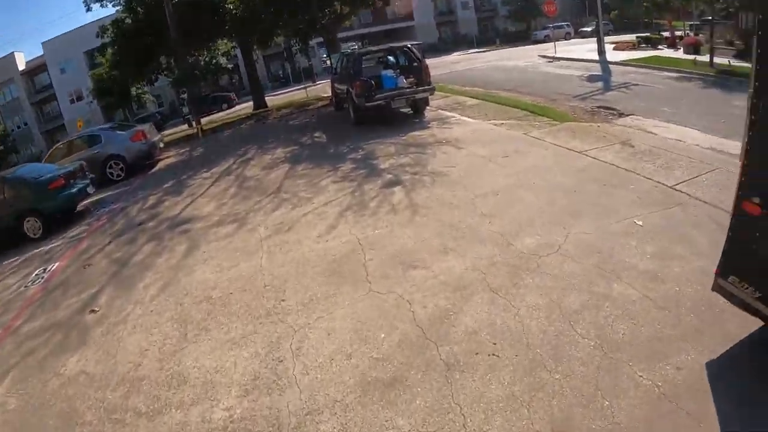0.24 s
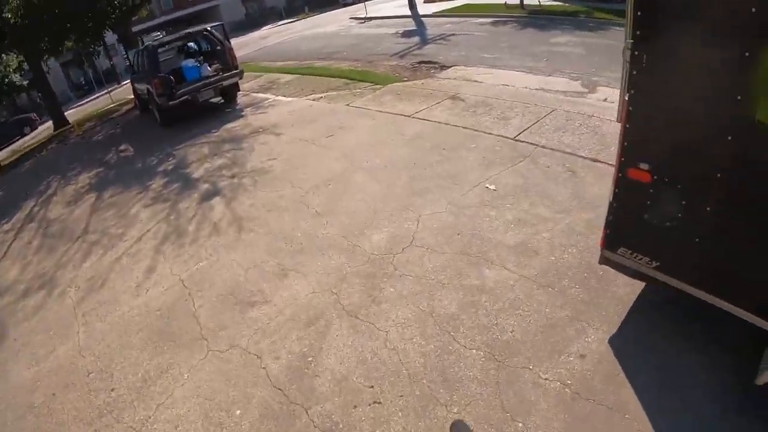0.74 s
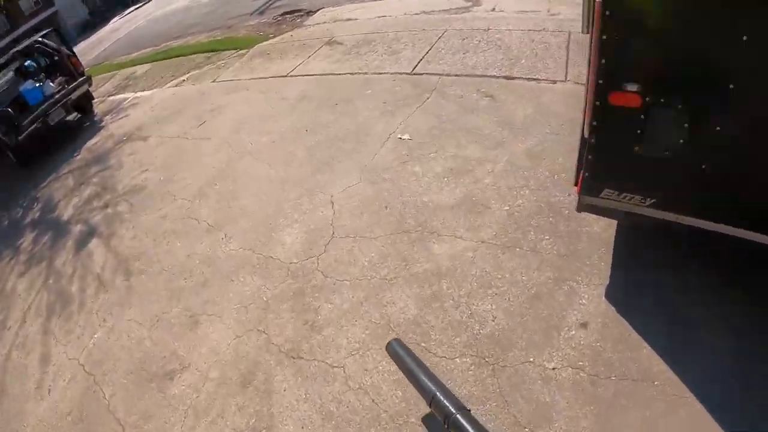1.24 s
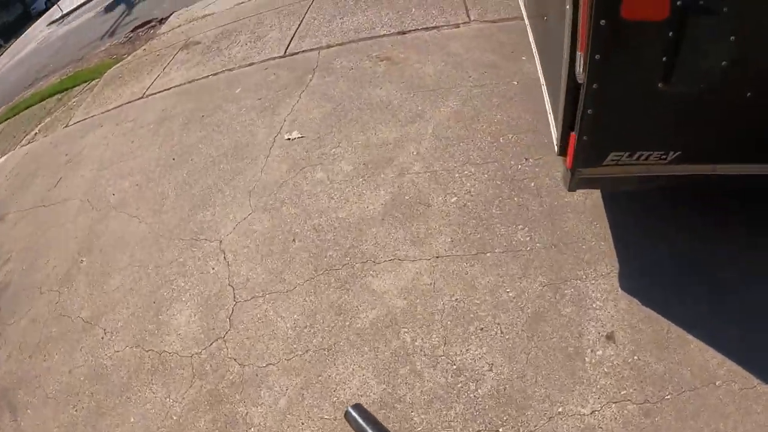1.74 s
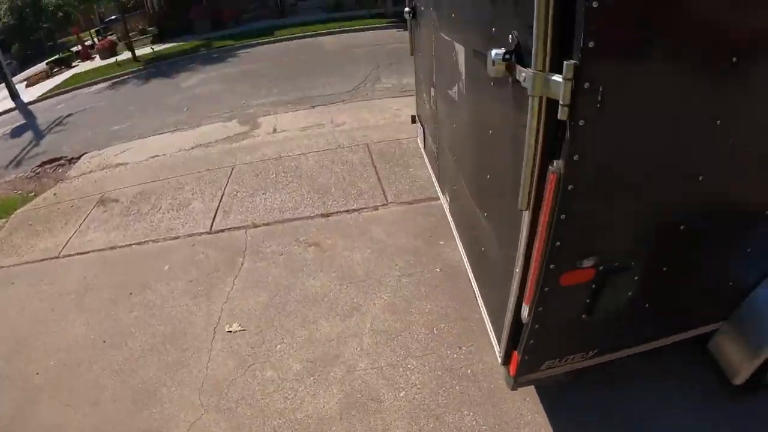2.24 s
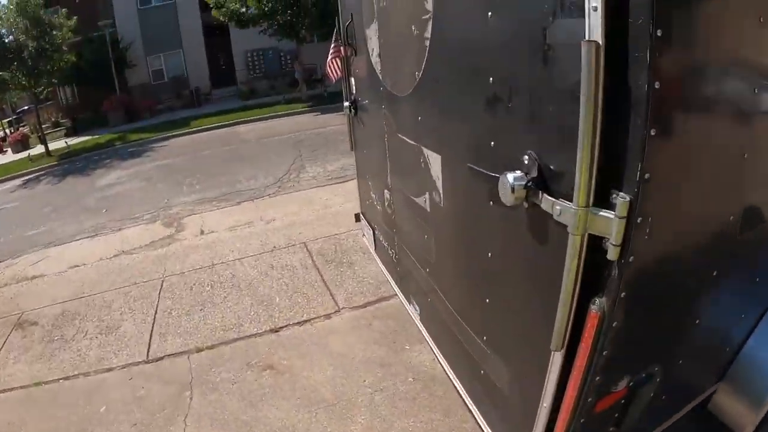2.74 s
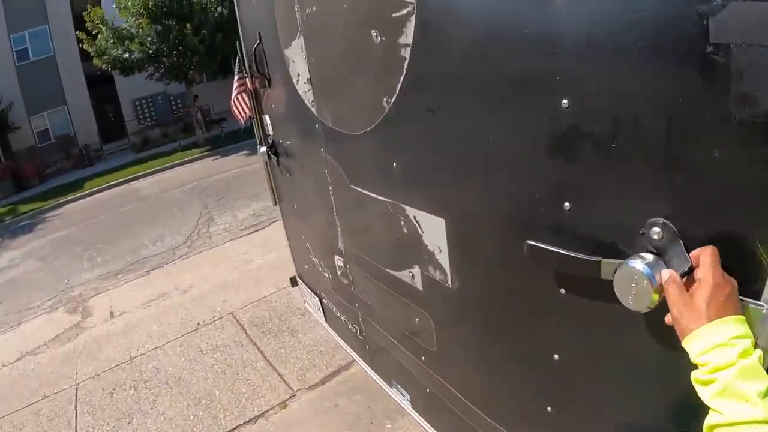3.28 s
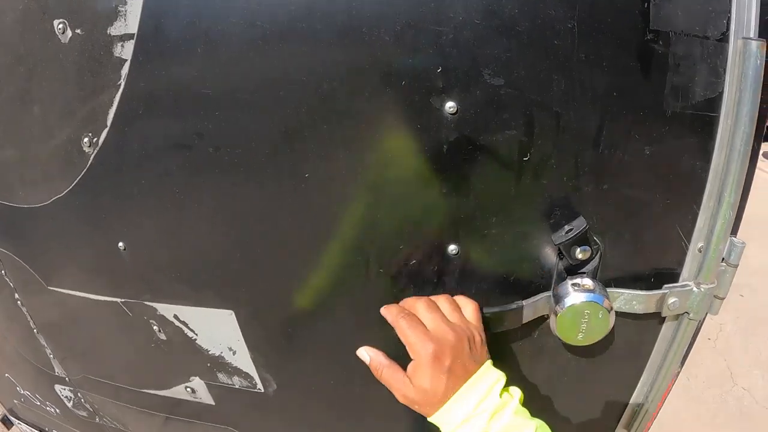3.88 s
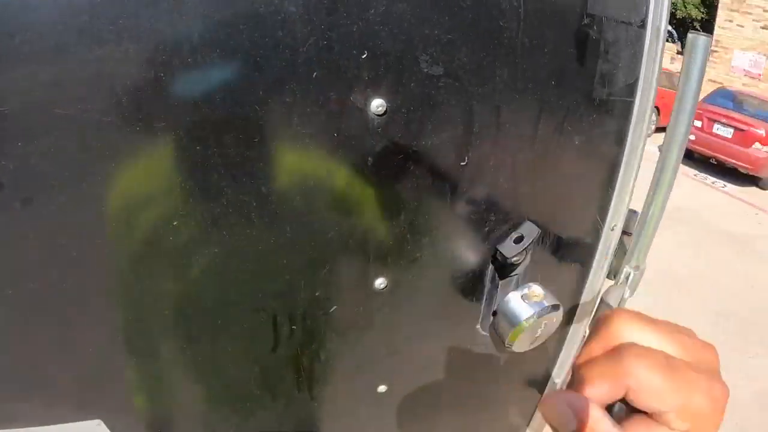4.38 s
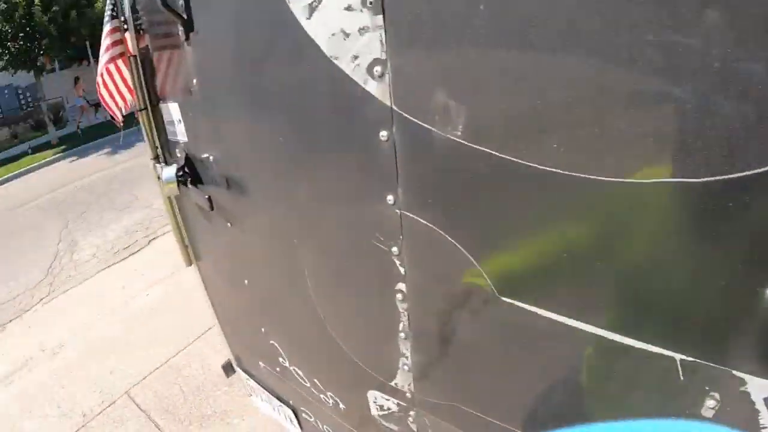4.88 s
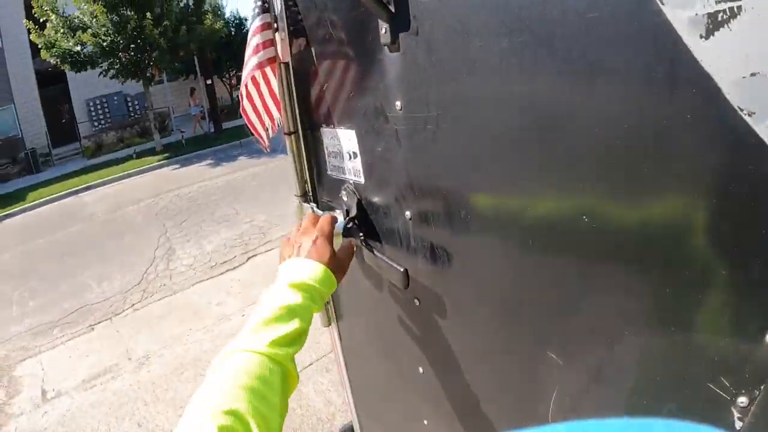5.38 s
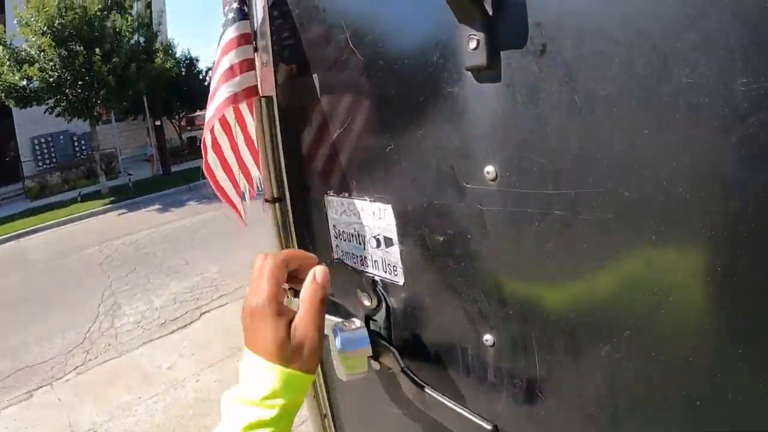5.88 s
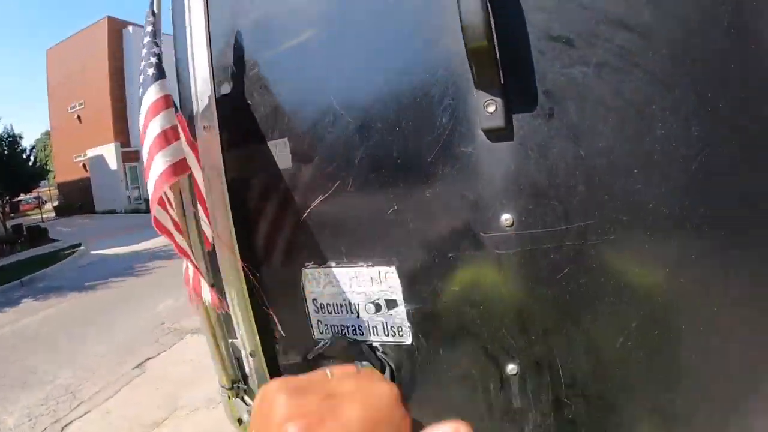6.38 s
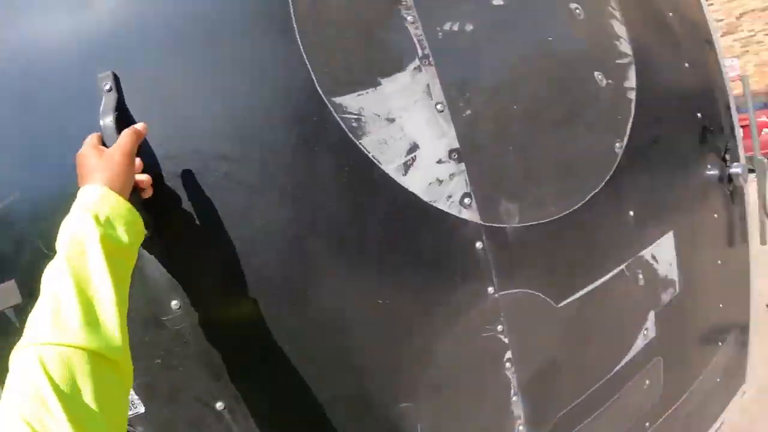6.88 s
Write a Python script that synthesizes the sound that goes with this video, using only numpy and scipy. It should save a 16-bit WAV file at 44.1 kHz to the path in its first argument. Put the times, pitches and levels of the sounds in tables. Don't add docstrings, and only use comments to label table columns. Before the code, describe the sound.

Outdoors on a street, close microphone. A small petrol engine drones low far away, revving higher around 0.9 to 2 s, under steady traffic hiss, faint leaves and early low wind rumble. Tiny ticks open; a brief drag comes at 0.85 s, then a tool clatters on concrete from 1.55 to 2.1 s, with sparrow and more distant bird chirps from 1.3 to 2.2 s. A lull follows. From 3.2 s a steel latch is touched and slid, a sharp scrape and crack at 3.6 to 3.7 s, a chirp near 3.45 s, dense clanks at 4.1 to 4.6 s and a booming slam at 4.77 s, tinkling away. The second latch knocks at 5.65 and 5.84 s, birds answering at 5.7 and 6.1 s; rattles at 6.1 to 6.4 s, a harsh stuttering squeal around 6.45 to 6.7 s, then the hardest bang at 6.71 s, ringing into a dragging, hollow tail until 7.1 s.

```python
import sys
import numpy as np
from scipy import signal
from scipy.fft import rfft, irfft, next_fast_len
from scipy.io import wavfile
from scipy.ndimage import uniform_filter1d, map_coordinates

SR = 44100
rng = np.random.default_rng(int(sys.argv[2]) if len(sys.argv) > 2 else 0)


def rack_gain(trim_db):
    fader = np.asarray(trim_db, float)
    return 10 ** (fader / 20)


def dump(signal):
    limited = np.clip(np.atleast_2d(signal).T, -1, 1)
    pcm = np.round(limited * 32767).astype(np.int16)
    wavfile.write(sys.argv[1], SR, pcm)


N = 313992

PART_T60 = [0.06, 0.31, 0.19, 0.12, 0.069]


def unit(x):
    return x / np.sqrt(np.mean(x ** 2) + 1e-20)


def along(points, hz):
    f, v = np.transpose(points)
    return np.interp(np.log(hz + 1), np.log(f + 1), v)


def curves(rows):
    s, *cols = np.transpose(rows)
    return [np.interp(np.arange(N) / SR, s, c) for c in cols]


def wobble(rate):
    knots = rng.standard_normal(int(N * rate / SR) + 4)
    return map_coordinates(knots, [np.arange(N) * rate / SR])


def filtered(x, response):
    m = next_fast_len(N + SR // 2)
    return irfft(rfft(x, m) * response(np.fft.rfftfreq(m, 1 / SR)), m)[..., :N]


def resonate(x, modes):
    def gain(f):
        total = 0
        for k, (centre, width, db) in enumerate(modes):
            ring = 1j * f * width / (centre * centre - f * f + 1j * f * width)
            total = total + (-1) ** k * rack_gain(db) * ring
        return total * (1 + 1j * f / (1.41 * modes[-1][0])) ** -2

    def even_gain(f):
        g = gain(f)
        return g / np.sqrt(np.mean(np.abs(g) ** 2))

    return filtered(x, even_gain)


def rush(spectrum, alike, patchy_db):
    z = signal.stft(rng.standard_normal((2, N)), nperseg=512)[2]
    field = uniform_filter1d(rng.standard_normal(z.shape[1:]), 6, 0)
    field = uniform_filter1d(field, 14, 1)
    pair = signal.istft(z * rack_gain(patchy_db * unit(field)), nperseg=512)[1][:, :N]

    def response(hz):
        turn = np.arccos(np.clip(along(alike, hz), -1, 1)) / 2
        return rack_gain(along(spectrum, hz)) * [np.cos(turn), np.sin(turn)]

    mid, side = filtered(pair, response)
    return unit(np.array([mid + side, mid - side]))


def knock(force):
    # weight on the door/dB, handle clank/dB
    tool = [(0.021, -66.5, 22, 22), (0.688, -66.5, 25, 5), (1.5539, -20.5, 1, 2.5), (1.5677, -25, -1.5, 6),
            (1.597, -37, 0, 6), (1.621, -41, 3, 12), (1.641, -42, -2, 0), (1.664, -44, 3, 8),
            (1.7627, -24, 2.5, 8.5), (1.7715, -39, 4, 12), (1.782, -34, 5.5, 12.5), (1.9045, -38, 12.5, 8),
            (1.944, -36, 4, 5), (1.964, -42, -4, 14), (1.9853, -45.5, -4, 17), (2.0048, -53, -3, 10),
            (1.8197, -35, 5.5, 7), (1.8982, -34.5, 12, 16.5), (1.9315, -27, 3.5, 5), (2.0443, -37, 1, 9),
            (2.1432, -47, 6.5, 16)]
    first_latch = [(3.2248, -43, -9, 5.5), (3.2765, -45.5, 9, 12.5), (3.3189, -46.5, 17.5, 10.5),
                   (3.55, -46, 7, 3), (3.677, -12.5, -9, -3), (3.913, -47.5, 20.5, 6.5),
                   (4.1097, -22, 10, 1), (4.1853, -13.5, -13, 1), (4.2352, -17.5, -9, 1),
                   (4.2623, -25.5, 4, 4.5), (4.2791, -20, 0.5, 1.5), (4.3132, -29.5, 5.5, 6.5),
                   (4.3284, -35.5, 8, -7), (4.402, -18.5, -4.5, -4.5), (4.529, -50, 15, 10),
                   (4.5382, -36, 9.5, 4), (4.559, -43, -6, 3), (4.632, -46, 19, 9), (4.733, -43.5, 17.5, 7),
                   (4.5765, -37.5, -14, 16), (4.5945, -40, -6, 11), (4.6112, -32.5, 6, 2),
                   (4.689, -45, 15, 8), (4.7665, -16.5, -2, 2.5)]
    second_latch = [(5.6238, -49, 8, 18), (5.6505, -19, -1, 1), (5.6655, -25, -2.5, 3),
                    (5.8385, -13.5, -6.5, 0), (5.875, -38, 5, 3), (6.0955, -25.5, 15, -1.5),
                    (6.1552, -33, -4, -20), (6.166, -36, 12, 0), (6.1814, -26.5, -3, 3.5),
                    (6.2163, -30, 0.5, -2), (6.2427, -23.5, -5, 3.5), (6.2543, -20.5, 0.5, -16),
                    (6.2756, -21, -5.5, 5), (6.345, -17.5, 1.5, 2.5), (6.4068, -27.5, 0, 0.5),
                    (6.7111, -8.5, -10, -1.5), (6.7498, -34, 5, 8), (6.8203, -39.5, 9.5, 8)]
    # t/s, level/dB
    pings = [(.105, -63), (.39, -65), (.715, -68), (.98, -62), (1.762, -34), (4.1089, -32), (4.2655, -38),
             (4.61, -42), (4.7663, -19), (6.241, -33.5), (6.255, -33.5), (6.2756, -37), (6.713, -20.5)]
    # panel/dB and frame/dB over the weight, edges/dB over the crack, share of the ring time
    places = ((tool, (-4.5, 3.5, -25, 0.67)),
              (first_latch, (0.8, -1.3, -23, 0.95)),
              (second_latch, (0.6, 0.15, -21.5, 0.8558)))
    t = np.arange(SR // 3) / SR
    rise = 1 - np.exp(-t / np.array([[.0003], [.003], [.0015], [.0006], [.0003]]))
    contact = np.array([[3.5], [.4], [.6], [2.5], [6]]) * rack_gain(-60 * t / 0.006)
    for blows, (panel_db, frame_db, edge_db, share) in places:
        for s, crack_db, weight_db, clank_db in blows:
            longer = rack_gain(0.5 * np.clip(weight_db + frame_db, -15, 10))
            t60 = share * np.array(PART_T60)[:, None] * longer
            shape = rise * (contact + rack_gain(-60 * t / t60)) * rack_gain([[-6], [-3], [-3], [-4], [-6]])
            parts_db = crack_db + np.array([0, weight_db + panel_db, weight_db + frame_db, clank_db, edge_db])
            force[:, round(s * SR):][:, :len(t)] += (rack_gain(parts_db)[:, None] * shape) ** 2
    for s, db in pings:
        shape = rise[-1] * (contact[-1] + rack_gain(-60 * t / PART_T60[-1]))
        force[-1, round(s * SR):][:len(t)] += (rack_gain(db - 7.0) * shape) ** 2


def rub(force):
    # start t/s, length/s, share that rises, scrape level/dB, heaviness/dB
    rubs = [
        (0.851, 0.096, 0.3, -38, 0),
        (3.39, 0.59, 0.11, -54.5, 12.5),
        (3.579, 0.078, 0.36, -26.5, -2),
        (3.572, 0.06, 0.35, -37.5, 8),
        (3.659, 0.22, 0.059, -55, 28.5),
        (4.53, 0.2, 0.3, -50, 6),
        (4.636, 0.27, 0.47, -55.5, 13),
        (4.794, 0.42, 0.098, -48, 8.5),
        (6.73, 0.6, .15, -51.5, 2.5),
        (6.064, 0.055, 0.66, -45, -9),
    ]
    grit = np.pad(unit(rack_gain(2.2 * wobble(300) + .8 * wobble(70))), (0, SR))
    for s, length, share, scrape_db, heavy_db in rubs:
        u, at = np.linspace(0, 1, round(length * SR)), round(s * SR)
        slowness = np.interp(u, [0, np.clip(share, .02, .98), 1], [1, 0, 1]) ** 1.74
        stroke = rack_gain(-36 * slowness) * grit[at:][:len(u)]
        parts_db = scrape_db + np.array([0, heavy_db - 17.0, heavy_db, 7, -13])
        push = stroke ** np.array([[1.2], [1], [1], [1], [1.8]])
        force[:, at:][:, :len(u)] += (rack_gain(parts_db)[:, None] * push) ** 2


def latches():
    # f/Hz, width/Hz, level/dB
    bar_modes = [(2490, 1400, 0), (3370, 620, 4.5), (4000, 760, 2.5), (4750, 590, 7.5), (5620, 1730, 1),
                 (7030, 970, -4.5)]
    panel_modes = [(58.3, 26.5, -4), (92.5, 17, -5), (129, 41, -4), (189, 68, -1.5), (279.5, 164, -4)]
    frame_modes = [(341, 70, -5.5), (435, 80, -2), (472.3, 39.5, -2.5), (596, 151, -2), (625, 660, -7)]
    handle_modes = [(959, 133, -2), (1195, 110, 3.5), (1365, 484, -1.5), (2057, 576, 0.5),
                    (2300, 666, -2.5)]
    edge_modes = [(7390, 500, 3.5), (9140, 1630, 2.5), (9890, 2070, 0.5), (12100, 290, -1.5),
                  (14500, 1300, -20)]
    parts = (bar_modes, panel_modes, frame_modes, handle_modes, edge_modes)
    force = np.zeros((5, N + SR))
    knock(force)
    rub(force)
    mid, side = np.sqrt(force[:, :N]) * rng.standard_normal((2, 5, N))
    side = side * np.array([[.15], [.07], [.06], [.12], [.3]])
    return [resonate(np.array([m + d, m - d]), modes) for m, d, modes in zip(mid, side, parts)]


def squeal():
    # t/s, level/dB, octave level/dB, harshness/dB
    surges = [(6.4492, -20, 4, -7), (6.47, -16, -1.5, -3), (6.48, -28, 1, 8), (6.496, -27.5, 7, -20),
              (6.514, -19, 3, -5), (6.53, -23.5, -4, -23), (6.568, -22, -13, -30), (6.582, -31, -10, -10),
              (6.595, -15.5, -1, -0.5), (6.617, -17.5, 3.5, 3.5), (6.635, -19, 2.5, 3.5),
              (6.65, -20.5, -4, 5), (6.665, -20.5, 2, 8.5), (6.681, -18.5, -2, 5.5),
              (6.695, -21, 4.5, 10.5)]
    # f/Hz, width/Hz, level/dB
    rod_modes = [
        [(944, 116, 9), (1014, 270, 5.5)],
        [(1976, 240, 6), (2130, 73, -9)],
        [(2900, 450, 1), (3830, 600, -1), (4800, 570, 0), (5750, 700, -7), (6550, 490, -6), (7700, 200, -5.5),
         (8800, 450, -11.5), (12000, 660, -45)],
    ]
    # t/s, slips per second/Hz
    slip_rate = [
        [(6.45, 1020), (6.47, 963), (6.494, 970), (6.504, 1010), (6.514, 950), (6.52, 990), (6.538, 1120),
         (6.545, 1110)],
        [(6.57, 1030), (6.596, 1020), (6.604, 975), (6.64, 950), (6.652, 1010), (6.662, 1018), (6.674, 1005),
         (6.71, 960)],
    ]
    force, t = np.zeros((3, N + SR)), np.arange(SR // 5) / SR
    for s, db, octave_db, harsh_db in surges:
        rise = 1 - np.exp(-t / np.array([[.005], [.005], [.009]]))
        swell = rise * rack_gain(db - 60 * t / 0.068)
        family_level = rack_gain([[0], [octave_db], [-4.5 + harsh_db]])
        force[:, round(s * SR):][:, :len(t)] += (swell * family_level) ** 2
    rate_hz = curves(np.concatenate(slip_rate))[0] * (1 + .025 * wobble(200))
    slips = np.diff(np.floor(np.cumsum(rate_hz) / SR), prepend=0)
    slips = unit(slips * rack_gain(2.4 * rng.standard_normal(N)))
    slips = slips + np.array([[.85], [.95], [1.05]]) * rng.standard_normal(N)
    force[:, round(6.712 * SR):] = 0
    return sum(resonate(np.sqrt(push[:N]) * drive, modes)
               for push, drive, modes in zip(force, slips, rod_modes))


def ringing(modes, beat):
    out, longest = np.zeros(N + SR), np.arange(SR // 2) / SR
    flicker = wobble(130)
    for s, hz, db, t60 in modes:
        t = longest[:round(t60 * SR)]
        starts = rng.integers(N - SR, size=(2, 1))
        loose, shift = beat * flicker[starts + np.arange(len(t))]
        level = rack_gain(db - 60 * t / t60) * (1 - np.exp(-t / 0.0004)) * (1 + loose)
        out[round(s * SR):][:len(t)] += level * np.sin(2 * np.pi * hz * t + shift)
    return out[:N]


def ringing_steel():
    # t/s, f/Hz, level/dB, t60/s
    tinkles = [(.716, 7200, -62, .12), (.725, 11300, -69, .2), (.975, 7800, -64, .15),
               (3.43, 6740, -56, 0.71), (3.229, 12700, -62, .25), (1.557, 1190, -21, 0.14),
               (3.692, 9930, -64, 0.21), (4.6, 9150, -51, .2), (3.229, 5760, -53, .26),
               (3.229, 7270, -50, 0.19), (3.229, 11310, -59, 0.28), (4.187, 4110, -10, 0.014),
               (4.192, 9900, -54, 0.49), (4.266, 11900, -44, 0.29), (4.397, 1804, -21, 0.054),
               (4.541, 9740, -51, 0.2), (4.769, 1290, -16, 0.084), (4.768, 3224, -13, 0.025),
               (4.769, 9300, -24, 0.032), (4.833, 4740, -50.5, 1.1), (4.851, 3260, -53, 0.99),
               (6.152, 523, -20, 0.3), (6.28, 1402, -20, 0.069), (6.286, 10000, -42, 0.11),
               (6.483, 8750, -39, 0.079), (6.711, 1237, -17.5, 0.14), (6.76, 4590, -52.5, 2.1),
               (6.8, 8800, -56.5, 0.86)]
    clinks = [(1.763, 4430, -16, 0.017), (1.772, 1220, -10, 0.02), (1.902, 1314, -19.5, .05),
              (1.932, 1296, -17.5, .06), (2.046, 2600, -33, .04), (2.046, 1275, -30, 0.094),
              (3.604, 4050, -26, 0.07), (3.6, 7260, -42, 0.092), (3.679, 9550, -35.5, 0.033),
              (4.112, 1179, -26, .07), (4.112, 2196, -37, 0.037), (4.112, 5500, -30, 0.074),
              (4.187, 8700, -47, 0.046), (4.187, 1530, -41, 0.027), (4.237, 5560, -22, 0.032),
              (4.237, 3580, -20, 0.027), (4.24, 666, -19, 0.064), (4.279, 4580, -25, .03),
              (4.314, 4700, -35, .03), (4.328, 3300, -32, 0.027), (4.403, 5070, -19, 0.032),
              (4.545, 1630, -36, 0.18), (4.559, 5000, -50, .03), (4.579, 4750, -37, .05),
              (4.577, 2200, -42, .04), (4.594, 3300, -31, .025), (4.594, 4800, -43, 0.034),
              (4.611, 6670, -37, .03), (4.612, 2300, -30, 0.038), (4.69, 3280, -41, 0.049),
              (4.69, 5800, -49, 0.046), (4.768, 4680, -13, 0.026), (5.839, 1920, -20, 0.063),
              (5.839, 4300, -25.5, 0.024), (5.839, 5200, -26, .03), (6.181, 2120, -27, 0.055),
              (6.19, 967, -25, .08), (6.243, 1920, -18.5, 0.055), (6.346, 4130, -23, .03),
              (6.408, 5010, -28, 0.027), (6.385, 6500, -49, 0.12), (6.39, 3830, -50, 0.14),
              (6.752, 3230, -31, .03), (5.667, 723, -24, 0.085), (5.84, 689, -18.5, 0.085),
              (3.28, 704, -32, 0.09), (6.713, 4560, -17, 0.035), (6.582, 4500, -38, 0.06),
              (6.575, 1260, -28, .1), (4.266, 6400, -23.5, 0.12), (4.768, 2140, -14, 0.023),
              (5.652, 561, -22.5, 0.095)]
    scrapes = [
        (4.579, 1283, -28, 0.2),
        (4.68, 1310, -38, .5),
        (4.728, 1330, -30, 0.35),
    ]
    return ringing(tinkles, beat=.6) + ringing(clinks, beat=.3) + ringing(scrapes, beat=.4)


def door_booms():
    # t/s, f/Hz, level/dB, t60/s
    booms = [(1.788, 199.2, -23.5, 0.82), (3.922, 88.5, -16.5, 0.16), (4.78, 130, -9.5, 0.18),
             (4.63, 160, -27, 0.97), (6.6, 225, -33, 0.7), (6.11, 150, -25, 0.46), (6.2, 210, -26.5, 0.65),
             (6.735, 320, -29, 0.6), (4.775, 245, -22, 0.31), (4.79, 340, -30.5, 0.7),
             (5.667, 320, -15, 0.12), (1.775, 105, -21.5, 0.2), (6.725, 98, -14.5, 0.36),
             (6.096, 150, -15, 0.15), (5.664, 480, -19, .1)]
    return ringing(booms, beat=.3)


def padlock():
    # t/s, level/dB, rise/s, t60/s
    shivers = [
        (3.4, -60, 0.039, .5),
        (3.62, -70, 0.022, 0.3),
        (4.25, -50, .02, 0.31),
        (4.77, -53.5, .002, 0.95),
        (5.69, -53, 0.029, 0.46),
        (6.2, -53, 0.027, 0.38),
        (6.72, -62, .002, .9),
    ]
    # f/Hz, width/Hz, level/dB
    shackle = [(9300, 400, 5), (10300, 190, -3), (11900, 700, -1), (13300, 200, -11)]
    force, t = np.zeros(N + SR), np.arange(SR // 2) / SR
    for s, db, rise_s, t60 in shivers:
        swell = rack_gain(db - 60 * t / t60) * (1 - np.exp(-t / rise_s))
        force[round(s * SR):][:len(t)] += swell ** 2
    mid, side = rng.standard_normal((2, N)) * np.sqrt(force[:N]) * rack_gain(2.7 * wobble(60))
    return resonate(np.array([mid + 1.0 * side, mid - 0.38 * side]), shackle)


def echoes(x, alike, openness):
    # f/Hz, t60/s
    walls = [(60, 0.91), (300, 0.95), (1500, 1), (5000, 0.94), (12000, 0.61)]
    out, turn = np.zeros((2, N)), (np.arange(N) // (SR // 40)) % 3
    for k in range(3):
        a, b = rng.standard_normal((2, SR))
        hz, t, z = signal.stft([a + alike * b, a - alike * b], SR, nperseg=256)
        fade = rack_gain(-60 * openness * t / along(walls, hz)[:, None])
        tail = signal.istft(z * fade, SR, nperseg=256)[1]
        tail = tail / np.linalg.norm(tail[0])
        part = x * uniform_filter1d((turn == k) * 1., size=200)
        late = np.pad(part, (300, 0))[None]
        out += signal.fftconvolve(late, tail, axes=1)[:, :N]
    return out


def chirps(calls, strokes, strokes_db):
    out = np.zeros(N + SR)
    for s, db, ratio, first_db in calls:
        for k, (after, length, *bend_hz) in enumerate(strokes):
            u = np.arange(round(length * SR)) / (length * SR)
            hz = ratio * np.polyval(np.polyfit([0, .5, 1], bend_hz, 2), u)
            hz += 70 * np.sin(2 * np.pi * (200 * length * u + rng.random()))
            level = rack_gain(db + strokes_db[k] + first_db * (k == 0)) * np.sin(np.pi * u) ** 0.45
            out[round((s + after) * SR):][:len(u)] += level * np.sin(2 * np.pi * np.cumsum(hz) / SR)
    return out[:N] * unit(rack_gain(3.3 * wobble(190)))


def birds():
    # t/s, level/dB, pitch ratio, first stroke level/dB
    sparrow_calls = [
        (1.65, -32.5, 0.997, -4),
        (3.452, -37.5, 1.035, -1),
    ]
    mate_calls = [
        (5.712, -32.5, 0.98, 0.19),
        (6.111, -30.5, 0.96, -2),
        (7.018, -45, 0.96, -1),
    ]
    warbler_calls = [(1.298, -49, 0.86, -7), (1.388, -43, 0.95, 6), (1.482, -46, .99, 6),
                     (1.683, -38, 1.07, -20), (1.879, -40, 1.03, 4), (1.98, -36.5, 1.06, 5),
                     (2.088, -42, 1.06, 5), (2.203, -42.5, 1, 13), (2.216, -44, 0.85, -20),
                     (2.103, -47, 0.94, -20), (1.696, -44, 0.86, -20)]
    far_calls = [
        (.19, -54, 1, .1),
        (.28, -52.5, 0.93, 0.091),
        (.36, -54, 0.84, .1),
        (.48, -60, 0.86, .1),
        (3.07, -51, .93, .1),
        (3.15, -53, 0.86, .1),
    ]
    # delay/s, length/s, start f/Hz, middle f/Hz, end f/Hz; then each stroke's level/dB
    sparrow_strokes = [
        (0, .028, 4750, 4950, 4950),
        (.028, .034, 4950, 5250, 5550),
        (.024, .034, 3950, 4600, 4800),
        (.056, .016, 5200, 4500, 3650),
        (.074, .026, 4500, 4700, 4500),
        (.074, .022, 5050, 5250, 5250),
    ]
    sparrow_db = [-5.5, -2.5, -4.5, 0, -8, -5.5]
    mate_strokes = [
        (0, .032, 4250, 4750, 4950),
        (.032, .03, 5100, 5350, 5500),
        (.03, .03, 4350, 4800, 4800),
        (.058, .012, 4900, 4600, 4200),
        (.074, .04, 5350, 4850, 4150),
    ]
    mate_db = [-3.5, -7, 1, -1.5, -6]
    warbler_strokes = [
        (-.01, 0.0097, 3050, 3350, 3700),
        (0, 0.018, 2900, 2776, 2450),
        (.024, .01, 2700, 2800, 2650),
    ]
    warbler_db = [-11, 0, -11]
    sparrow = chirps(sparrow_calls, sparrow_strokes, sparrow_db) + chirps(mate_calls, mate_strokes, mate_db)
    warbler = chirps(warbler_calls, warbler_strokes, warbler_db)
    far = chirps(far_calls, sparrow_strokes, sparrow_db)
    to_walls = np.pad(rack_gain(-3) * sparrow + rack_gain(-10) * warbler, (SR // 80, 0))[:N]
    near = sparrow + rack_gain(-2.5) * warbler + echoes(to_walls, alike=.6, openness=2.1)
    return near + echoes(far, alike=0.34, openness=1.4) + rack_gain(-7.5) * far


def engine(level_db):
    # t/s, firings per second/Hz
    firing = [
        (0, 55),
        (.9, 78),
        (1.6, 75),
        (2.2, 51.5),
        (3, 55),
        (7.12, 48),
    ]
    # f/Hz, level/dB
    exhaust = [(20, -40), (45, 7), (60, 7.5), (120, 7), (180, -8.5), (260, -33), (500, -47), (1500, -120)]
    turns = np.cumsum(curves(firing)[0] * (1 + 0.028 * wobble(3.3))) / SR
    puffs = np.diff(np.floor(turns), prepend=0) * rack_gain(3.6 * rng.standard_normal(N))
    clean = unit(filtered(puffs, lambda hz: rack_gain(along(exhaust, hz))))
    blur = rush(exhaust, [(60, 1.0)], patchy_db=0.0)
    return rack_gain(level_db - 2.0) * unit(.65 * clean * rack_gain(2.5 * wobble(4)) + blur)


def traffic(level_db):
    # f/Hz, level per Hz/dB
    hiss = [(88, -43), (150, -3.5), (234, -0.5), (371, -7.5), (1200, -10), (1910, -17), (7080, -46.5),
            (15000, -114)]
    # f/Hz, likeness from 0 to 1
    likeness = [(60, 0.97), (240, 0.98), (950, 0.74), (3770, 0.17), (15000, 0.68)]
    return rack_gain(level_db + 1.5) * rush(hiss, likeness, patchy_db=.6)


def wind(level_db):
    # f/Hz, level per Hz/dB
    rumble = [(12, -21), (20, 10.5), (48, 9), (86, -12), (119, -1.5), (200, -17.5), (260, -57), (440, -120)]
    # t/s, left minus right/dB
    lean = [
        (0, -1.5),
        (2.5, 0.5),
        (3.2, -1.5),
    ]
    gusts = unit(rack_gain(0.32 * wobble(3.3)) * rush(rumble, [(30, 0.79)], patchy_db=-1.0))
    lean_db = np.array([[.5], [-.5]]) * curves(lean)[0]
    return rack_gain(level_db + 7.5 + lean_db) * gusts


def leaves(level_db):
    # f/Hz, level per Hz/dB
    rustle = [(1500, -31), (3000, -5.5), (5000, -6), (7500, -12.5), (10000, -22), (13000, -34)]
    return rack_gain(level_db + 9) * rush(rustle, [(5000, 0.55)], patchy_db=2.5)


def street():
    # t/s, wind/dB, engine/dB, traffic/dB, leaves/dB
    street_levels = [(0.0, -45.5, -37, -46.5, -75.5), (.8, -39.5, -37, -48, -74),
                     (1.5, -46.5, -38, -46, -73), (2.35, -51.5, -43, -46.5, -76),
                     (2.7, -56, -36.5, -47, -70), (3.1, -51.5, -38.5, -47.5, -68.5),
                     (4.88, -67, -32.5, -51.5, -74.5), (5.29, -61, -39, -51.5, -70.5),
                     (6.62, -69, -32.5, -46.5, -60.5), (7.12, -77, -38.5, -54.5, -67.5)]
    wind_db, engine_db, traffic_db, leaves_db = curves(street_levels)
    return wind(wind_db) + engine(engine_db) + traffic(traffic_db) + leaves(leaves_db)


def to_ears(x):
    # t/s, left minus right/dB
    side_of = [
        (0.0, 1),
        (5.71, -0.5),
        (7.12, 4.5),
    ]
    # f/Hz, left minus right/dB
    tilt = [(60, 2), (180, -2), (550, -1), (1650, -1), (4970, -2), (15000, 3)]
    # f/Hz, phase by which left leads/rad
    ports = [(0, 1), (2930, -0.71), (5000, -0.58), (12000, -0.29), (13400, 0.0), (16000, 0.1)]
    sides = np.array([[.5], [-.5]])
    panned = x * rack_gain(sides * curves(side_of)[0])
    return filtered(panned, lambda hz: rack_gain(sides * along(tilt, hz)) * np.exp(1j * sides * along(ports, hz)))


def scene():
    bar, panel, frame, handle, edge = latches()
    rod = squeal() + ringing_steel()
    panel = panel + door_booms()
    steel = bar + handle + edge
    near = panel + to_ears(steel + rod + frame)
    hollow = rack_gain(-20.5) * steel + rack_gain(-15.5) * frame + rack_gain(-9.5) * panel
    box = echoes(hollow[0] + rack_gain(-25) * rod, alike=0.018, openness=1.0)
    return near + box + padlock() + birds() + street()


def roll_off(x):
    return signal.sosfilt(signal.butter(12, 16480, fs=SR, output="sos"), x)


def record(dry):
    # f/Hz, level/dB
    mic = [(20, 0), (9000, -3), (12500, -7.5), (14500, -10), (16500, -32.5), (22000, -60)]
    mix = filtered(dry, lambda hz: rack_gain(along(mic, hz)))
    return roll_off(mix)


dry = scene()
out = record(dry)
dump(out)
```